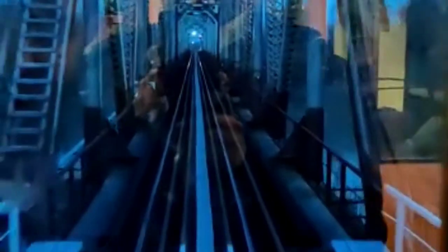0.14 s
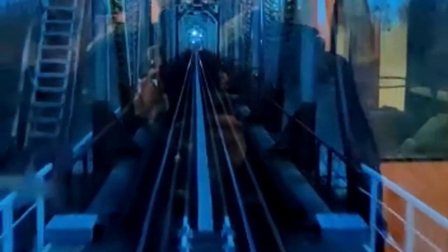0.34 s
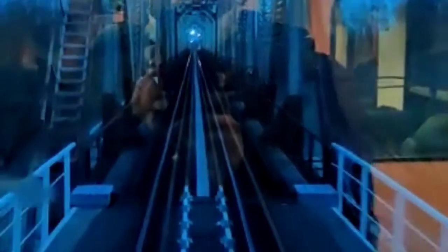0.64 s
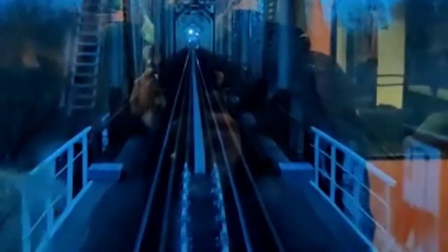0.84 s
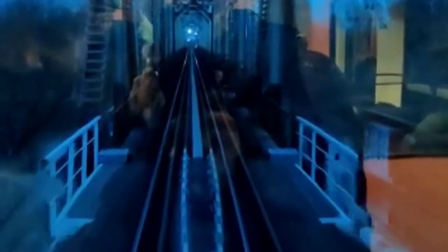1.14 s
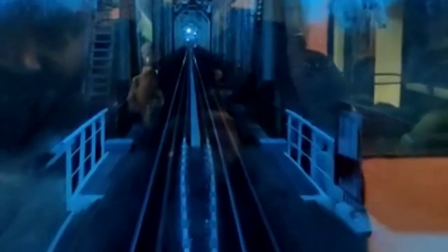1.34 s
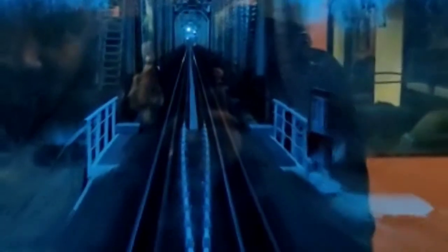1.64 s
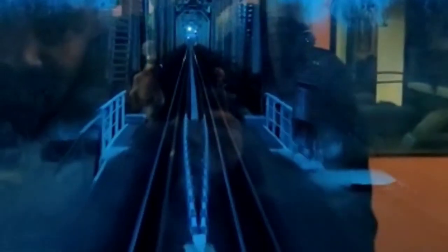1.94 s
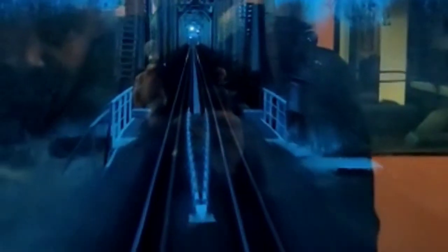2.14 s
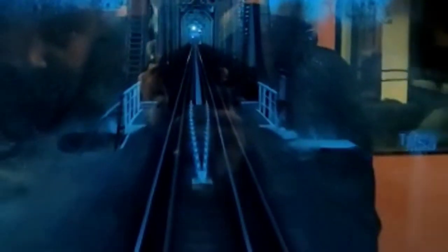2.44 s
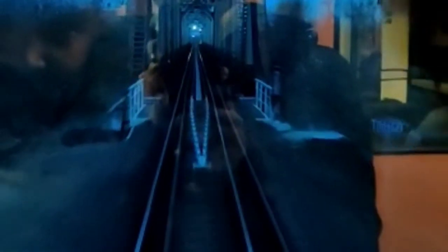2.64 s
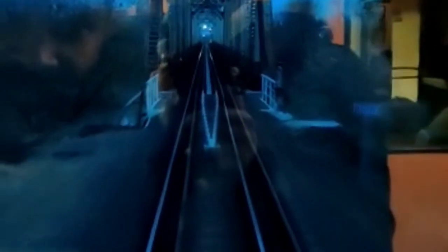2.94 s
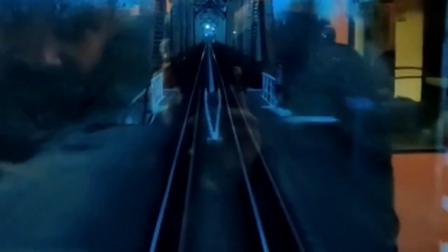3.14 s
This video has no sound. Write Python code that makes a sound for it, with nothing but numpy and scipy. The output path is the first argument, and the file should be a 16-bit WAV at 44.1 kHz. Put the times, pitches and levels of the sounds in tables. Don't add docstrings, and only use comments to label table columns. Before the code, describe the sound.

A train rumbles off a steel bridge, heavy uneven clacks shaking the cabin, small fittings rattling.

```python
import sys
import numpy as np
from scipy import signal
from scipy.fft import rfft, irfft, next_fast_len
from scipy.io import wavfile
from scipy.ndimage import uniform_filter1d, minimum_filter1d, map_coordinates

SR = 44100
rng = np.random.default_rng(int(sys.argv[2]) if len(sys.argv) > 2 else 0)


def master(y):
    cut = np.clip(np.atleast_2d(y).T, -1, 1)
    pcm = np.round(cut * 32767)
    wavfile.write(sys.argv[1], SR, pcm.astype(np.int16))


def to_linear_factor(level_db):
    exponent = np.asarray(level_db, float) / 20
    return 10 ** exponent


N = 145530
T = np.arange(N) / SR

# (time [s], level [dB])
ROLL_LEVEL = [(0.0, -41.5), (0.2, -43), (0.76, -39.5), (0.92, -40), (1.15, -45), (1.41, -44.5), (1.59, -45),
              (2.22, -45), (2.52, -47.5), (2.94, -45), (3.3, -44.5)]
# (time [s], level [dB])
BOOM_LEVEL = [(0.0, -28), (0.3, -24), (0.36, -18.5), (0.73, -22.5), (0.84, -17), (0.95, -22.5), (1.54, -22),
              (1.82, -18), (1.92, -22), (2.16, -19), (2.19, -25), (2.23, -18.5), (2.44, -25.5),
              (2.47, -14.5), (2.51, -24), (3.09, -23.5), (3.14, -19), (3.3, -24)]
# (time [s], level [dB])
SWAY_LEVEL = [(0.0, -32), (0.04, -21.5), (0.09, -31), (0.76, -20), (0.79, -11.5), (0.89, -9.5),
              (1.02, -20.5), (1.06, -12), (1.2, -27), (1.31, -14.5), (1.34, -24), (1.59, -14),
              (2.41, -25.5), (2.66, -16.5), (2.84, -30.5), (2.99, -21), (3.15, -31), (3.3, -31)]
# (frequency [Hz], level [dB])
ROLL_COLOUR = [(100, -1.5), (200, -0.5), (450, -9), (700, -17), (1300, -25), (2500, -35), (4000, -43),
               (14000, -63.5)]
# (frequency [Hz], width [Hz], level [dB])
WALLS = [(160, 19.3, -0.5), (222.8, 11.4, 1), (259.5, 15, -1), (304.2, 15.8, -7.5), (353.7, 23.4, -6),
         (390.8, 9.9, -4.5), (470.3, 45.5, -10.5), (599.1, 13, -15), (768.5, 22, -26.5), (1079, 55, -27.5),
         (1217, 61, -26), (1411, 44, -34), (1600, 5.4, -27), (2427, 6.8, -39.5)]
BODY = [
    (47, 10, 3, -4),
    (67.1, 8.8, -1.5, 0),
    (89.3, 11.3, -2.5, -2),
    (125.9, 13.3, -8.5, -2.5),
]
# (frequency [Hz], level [dB])
SWAY_COLOUR = [(4, -21.5), (10, -0.5), (18, 3), (28, -14), (45, -29)]
# (time [s], level [dB], bass tilt [dB/octave], treble tilt [dB/octave], hold [s])
JOINTS = [(0.016, -46, 5, 1.5, 0.026), (.13, -41.5, -0.3, 0, 0.084), (0.268, -40.5, 1.5, -4.7, 0.042),
          (0.582, -32.5, -0.5, -2.5, 0.033), (.705, -27.5, 3, 1.9, .035), (0.762, -34.5, -1.3, 4.2, 0.014),
          (.984, -23.5, 2.5, 1.9, 0.038), (1.384, -27.5, -2.3, -1.5, 0.036), (1.521, -39.5, 2.5, -4, 0.14),
          (1.659, -21, -1.1, -1.5, 0.028), (2.405, -49, -5, 2.2, 0.053)]
# (frequency [Hz], level [dB])
CLACK_COLOUR = [(70, -17.5), (160, 2.5), (450, -3), (1000, -9), (2200, -19.5), (4000, -24), (8000, -34.5),
                (14000, -42)]
# (frequency [Hz], t60 [s])
CLACK_T60 = [(200, 0.69), (800, 0.42), (3000, 0.36), (10000, 0.21)]
# (frequency [Hz], width [Hz], level [dB])
PANELS = [(255, 40, 6), (348, 17, 7.5), (516, 35, 6), (800, 55, -10.5), (1278, 70, 6.5), (1600, 8.3, -4.5),
          (1950, 56, -2), (2520, 130, -5)]
# (time [s], frequency [Hz], level [dB], t60 [s])
KNOCKS = [(.708, 4800, -48.5, 0.2), (.715, 160, -19, 0.22), (.72, 1950, -46, 0.46),
          (.738, 1170, -32.5, 0.25), (.785, 47, -20.5, 1), (0.985, 4800, -42.5, 0.33),
          (.985, 159, -20.5, 0.5), (.995, 1600, -30.5, 0.29), (1.415, 256, -28, 0.36),
          (1.664, 800, -25, 0.37), (1.665, 684, -31.5, 0.32), (1.68, 262, -24, 0.41),
          (1.67, 547, -34.5, 0.24), (2.71, 147, -21.5, 0.6)]
# (time [s], frequency [Hz], level [dB], t60 [s])
MORE_KNOCKS = [(.267, 685, -35.5, 0.14), (.579, 613, -32, 0.11), (.591, 2460, -50, .1),
               (.711, 2900, -49.5, .25), (.718, 4750, -47.5, 0.17), (.74, 2420, -51, 0.35),
               (.746, 390, -26, .32), (.81, 4600, -60, .3), (.977, 530, -26, 0.088), (.99, 2400, -34, 0.2),
               (1.055, 2580, -51, .3), (1.09, 2320, -53, .3), (1.10, 4830, -57.5, 0.33),
               (1.377, 4630, -57, 0.24), (1.399, 271, -22, 0.17), (1.405, 860, -34, 0.22),
               (1.428, 1130, -40, 0.13), (1.664, 2410, -47, 0.27), (1.681, 866, -30, .22),
               (1.695, 1100, -34.5, 0.25), (1.724, 815, -33, .32), (1.74, 368, -26, 0.38),
               (2.405, 648, -46.5, 0.11), (2.41, 255, -31, 0.53), (3.04, 315, -42, 0.37)]
# (time [s], pitch [Hz], level [dB], length [s])
SQUEAKS = [(.010, 4940, -48, 0.033), (.026, 2115, -43, 0.02), (0.0088, 4430, -51, 0.035),
           (.026, 5100, -55, 0.029), (0.012, 3360, -58, .045), (.049, 2020, -50, 0.021),
           (0.04, 4915, -54, 0.032), (0.097, 4590, -63, .03), (.109, 4275, -53, 0.046),
           (0.13, 4755, -55, .023), (.132, 4760, -51.5, .034), (0.37, 4810, -51, 0.024)]
# (time [s], centre [Hz], level [dB], length [s])
RATTLES = [(.005, 8000, -70, 0.024), (.14, 8100, -71, 0.037), (.62, 8350, -67, 0.078),
           (.66, 4800, -47.5, 0.082), (.67, 8100, -55, 0.058), (.69, 12760, -62.5, 0.031),
           (.87, 8050, -72.5, 0.16), (.88, 4800, -49.5, 0.095), (.955, 8000, -58, 0.032),
           (1.38, 8600, -71, 0.11), (1.66, 8200, -51.5, 0.021), (1.675, 6330, -58.5, 0.025),
           (2.185, 8600, -72, 0.06), (2.9, 4900, -63, 0.12), (1.02, 8000, -64, 0.061),
           (.74, 7950, -63.5, 0.064), (.985, 13100, -63, .05), (2.48, 9000, -71, .04),
           (2.615, 9200, -66.5, .04), (2.9, 14000, -76.5, .03), (2.19, 10400, -72, .05),
           (2.19, 7000, -71, .05), (.73, 3520, -52, .06), (1.0, 3400, -49.5, .07)]
# (time [s], pitch [Hz], level [dB], t60 [s])
PINGS = [
    (1.668, 8400, -50, .06),
    (2.482, 9000, -63, .06),
    (2.618, 8920, -50.5, 0.2),
    (2.619, 14550, -66.5, .2),
    (2.619, 13800, -73, .12),
]
# (frequency [Hz], width [Hz], level [dB])
WHINE = (4780, 580, -66)
# (frequency [Hz], likeness [0..1])
ALIKE = [(60, 1), (100, 0.98), (160, 0.81), (300, 0.76), (600, 0.72), (1500, 0.17), (4000, 0.29),
         (12000, 0.23)]
# (frequency [Hz], level [dB])
BALANCE_DB = [(40, 0), (100, 3), (250, 1.6), (700, 0), (1300, 1), (3000, 7), (5000, 6.5), (7000, 1)]
# (frequency [Hz], width [Hz], level [dB])
PORTS = [
    (4800, 274, 8.5),
    (5460, 740, 7),
]
# (frequency [Hz], level [dB])
MIC = [(4500, 1), (5400, -4.5), (6300, -10), (8500, -4), (13300, -12.5), (14500, -28)]
# (frequency [Hz], level [dB])
HISS = [(300, -50), (3000, 3.5), (8000, -6), (13000, -8.5), (16000, -10.5)]

ROLL_DB, WALLS_DB, BOOM_DB, SWAY_DB, HISS_DB = 12.5, 12.5, 2, 2, -65
BRIDGE_END_S, BRIDGE_FADE_S = 1.82, 0.3
OFFSET_DB, OFFSET_S = -17, 0.0065
CLACK_RISE_S, CLACK_PATCHY_DB = 0.0036, 1.33
KNOCK_RISE_S, KNOCK_WIDTH_SHARE = 0.0043, 0.11
SQUEAK_WIDTH_HZ, RATTLE_WIDTH_SHARE = 81, 0.18
PING_RISE_S, PING_WIDTH_HZ = 0.0015, 320
RIGHT_LAG_S = 18.0 / 44100
LAG_FROM_HZ = 480
LIMIT, LIMIT_S = 0.86, 0.03
EVENT_T = T[:SR // 3]


def unit(x):
    return x / np.sqrt(np.mean(x ** 2) + 1e-20)


def along(points, hz):
    f, v = np.transpose(points)
    return np.interp(np.log(hz + 1), np.log(f + 1), v)


def curve(rows):
    return np.interp(T, *np.transpose(rows))


def wobble(rate_hz):
    knots = rng.standard_normal(int(N * rate_hz / SR) + 4)
    return map_coordinates(knots, [T * rate_hz])


def filtered(x, response):
    n = x.shape[-1]
    m = next_fast_len(n + 8192)
    return irfft(rfft(x, m) * response(np.fft.rfftfreq(m, 1 / SR)), m)[..., :n]


def peak(f, hz, width_hz):
    damping = 1j * f * width_hz
    return damping / (hz * hz - f * f + damping)


def steady(x, span_s, give):
    power = np.abs(uniform_filter1d(x[0] ** 2, size=round(span_s * SR)))
    return x / np.sqrt(power + give)


def pair(size, patchy_db, t60=None, hold_s=0):
    hz, t, z = signal.stft(rng.standard_normal((2, size)), SR, nperseg=256)
    patches = uniform_filter1d(rng.standard_normal(z.shape[1:]), size=3, axis=0)
    patches = uniform_filter1d(patches, size=12, axis=1)
    gain_db = patchy_db * unit(patches)
    if t60:
        gain_db = gain_db - 60 * np.maximum(t - hold_s, 0) / along(t60, hz)[:, None]
    noise = signal.istft(z * to_linear_factor(gain_db), nperseg=256)[1][:, :size]

    def share(f):
        angle = np.arccos(np.clip(along(ALIKE, f), -1, 1)) / 2
        return np.sqrt(2) * np.array([np.cos(angle), np.sin(angle)])

    common, opposed = filtered(noise, share)
    return np.array([common + opposed, common - opposed]) / np.sqrt(2)


def resonant(size, patchy_db, hz, width_hz):
    return unit(filtered(pair(size, patchy_db), lambda f: peak(f, hz, width_hz) ** 2))


def add(track, s, x):
    part = track[:, round(max(s, 0) * SR):][:, :x.shape[1]]
    part += x[:, :part.shape[1]]


def rolling():
    roar = unit(filtered(pair(N, patchy_db=1.0), lambda f: to_linear_factor(along(ROLL_COLOUR, f))))
    wall_modes = lambda f: sum(to_linear_factor(db) * peak(f, hz, w) ** 2 for hz, w, db in WALLS)
    walls = unit(filtered(pair(N, patchy_db=1.24), wall_modes))
    strength = to_linear_factor(curve(ROLL_LEVEL) + 0.65 * wobble(6.69))
    return strength * (to_linear_factor(ROLL_DB) * roar + to_linear_factor(WALLS_DB) * walls)


def clacks():
    out = np.zeros((2, N))
    rise = (1 - np.exp(-EVENT_T / CLACK_RISE_S)) ** 2
    for s, db, bass_tilt, treble_tilt, hold_s in JOINTS:
        ring = to_linear_factor(rng.normal(0, 2.5, len(PANELS)))

        def colour(f):
            tilt_db = np.where(f < 1000, bass_tilt, treble_tilt) * np.log2(f / 1000 + 1e-3)
            panels = sum(g * to_linear_factor(p) * np.abs(peak(f, hz, w)) for g, (hz, w, p) in zip(ring, PANELS))
            return to_linear_factor(along(CLACK_COLOUR, f) + tilt_db) * np.abs(1 + panels)

        blow = filtered(pair(len(EVENT_T), CLACK_PATCHY_DB, CLACK_T60, hold_s), colour)
        blow = blow / np.std(blow[:, :SR // 25])
        add(out, s, to_linear_factor(db) * blow * rise)
    return out


def knocks(rows):
    out = np.zeros((2, N))
    rise = 1 - np.exp(-EVENT_T / KNOCK_RISE_S)
    for s, hz, db, t60 in rows:
        tone = resonant(len(EVENT_T), 5.5, hz, KNOCK_WIDTH_SHARE * hz)
        add(out, s, to_linear_factor(db - 60 * EVENT_T / t60) * steady(tone, 0.03, 0.23) * rise)
    return out


def carriage():
    rough = pair(N, patchy_db=2.66)
    on_bridge = 1 / (1 + np.exp((T - BRIDGE_END_S) / BRIDGE_FADE_S))
    modes = np.zeros((2, N))
    for hz, width_hz, bridge_db, ballast_db in BODY:
        mode = unit(filtered(rough, lambda f: peak(f, hz, width_hz) ** 2))
        mode_db = on_bridge * bridge_db + (2 - on_bridge) * ballast_db
        modes += to_linear_factor(mode_db) * steady(mode, 0.18, 0.58)
    return to_linear_factor(curve(BOOM_LEVEL) + BOOM_DB) * steady(unit(modes), 0.09, 0.37)


def cabin_air():
    sway = unit(filtered(pair(N, patchy_db=1.1), lambda f: to_linear_factor(along(SWAY_COLOUR, f)) * (f < 60)))
    offset_fade = to_linear_factor(OFFSET_DB) * np.exp(-T / OFFSET_S)
    return to_linear_factor(curve(SWAY_LEVEL) + SWAY_DB) * steady(sway, 0.14, 0.14) - offset_fade


def rubbing(rows, width_of, grain_db):
    out = np.zeros((2, N))
    size = len(EVENT_T)
    for s, hz, db, length_s in rows:
        grains = to_linear_factor(grain_db * np.repeat(rng.standard_normal(size // 40 + 1), 40)[:size])
        source = pair(size, patchy_db=3.5) * grains
        sound = unit(filtered(source, lambda f: peak(f, hz, width_of(hz)) ** 2))
        swell = np.sin(np.pi * np.clip(EVENT_T / (1.36 * length_s), 0, 1))
        add(out, s, to_linear_factor(db) * steady(sound, 0.0092, 0.6) * swell)
    return out


def squeaks():
    return rubbing(SQUEAKS, lambda hz: SQUEAK_WIDTH_HZ, grain_db=0.5)


def rattles():
    return rubbing(RATTLES, lambda hz: RATTLE_WIDTH_SHARE * hz, grain_db=2.5)


def pings():
    out = np.zeros((2, N))
    rise = 1 - np.exp(-EVENT_T / PING_RISE_S)
    for s, hz, db, t60 in PINGS:
        tone = resonant(len(EVENT_T), 2.0, hz, PING_WIDTH_HZ)
        add(out, s, to_linear_factor(db - 60 * EVENT_T / t60) * tone * rise)
    return out


def whine():
    hz, width_hz, db = WHINE
    return to_linear_factor(db) * resonant(N, 2.0, hz, width_hz)


def scene():
    def ports(f):
        return to_linear_factor(along(MIC, f)) * np.array([1 + to_linear_factor(db) * peak(f, hz, w) for hz, w, db in PORTS])

    struck = rolling() + clacks() + knocks(KNOCKS) + knocks(MORE_KNOCKS)
    body = carriage() + cabin_air()
    fittings = squeaks() + rattles() + pings()
    return filtered(struck, ports) + body + fittings + whine()


def spaced(dry):
    side = np.array([[0.5], [-0.5]])

    def response(f):
        lag_s = side * RIGHT_LAG_S / (1 + (LAG_FROM_HZ / (f + 1)) ** 4)
        return to_linear_factor(side * along(BALANCE_DB, f)) * np.exp(2j * np.pi * f * lag_s)

    return filtered(dry, response)


def limited(x):
    need = LIMIT / np.maximum(np.abs(x).max(axis=0), LIMIT)
    need = minimum_filter1d(need, size=round(2 * LIMIT_S * SR))
    return x * uniform_filter1d(need, size=round(LIMIT_S * SR))


def band_limit(x):
    return signal.sosfilt(signal.butter(12, 15750, fs=SR, output="sos"), x)


def record(dry):
    hiss = unit(filtered(rng.standard_normal(dry.shape), lambda f: to_linear_factor(along(HISS, f))))
    mix = limited(spaced(dry)) + to_linear_factor(HISS_DB) * hiss
    return band_limit(mix)


dry = scene()
out = record(dry)
master(out)
```